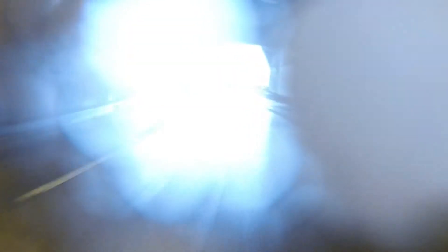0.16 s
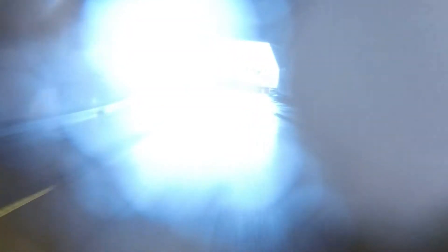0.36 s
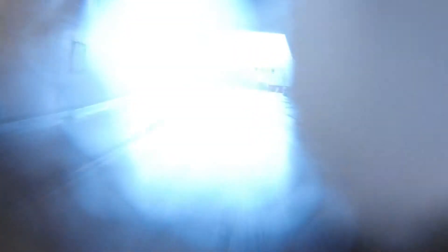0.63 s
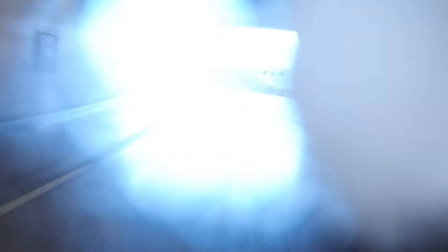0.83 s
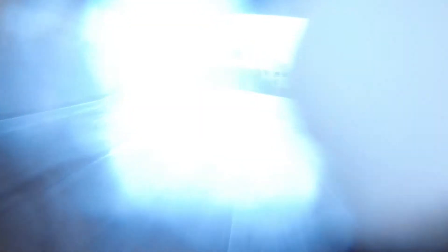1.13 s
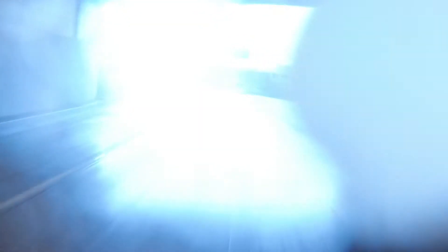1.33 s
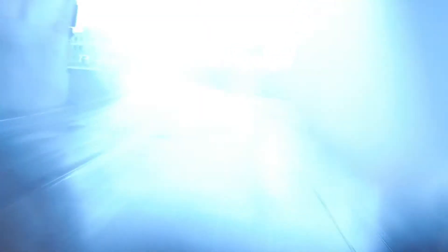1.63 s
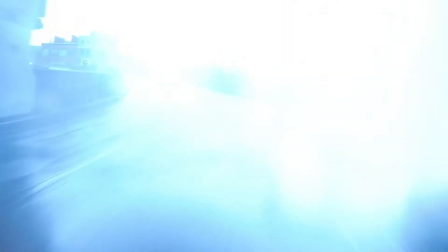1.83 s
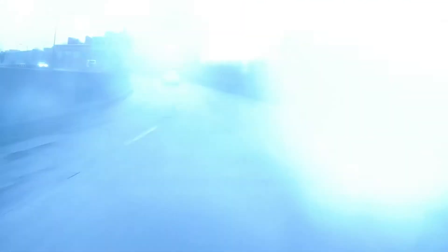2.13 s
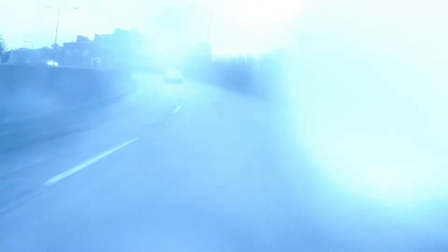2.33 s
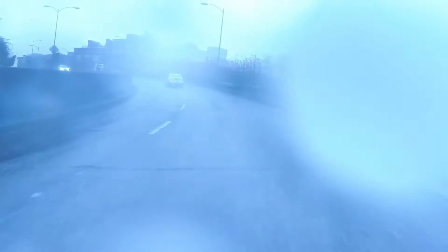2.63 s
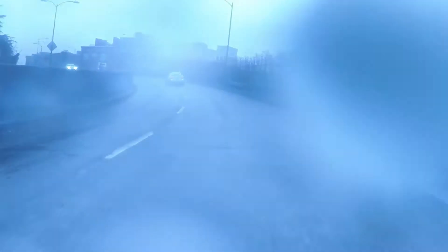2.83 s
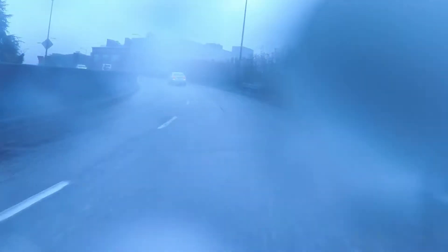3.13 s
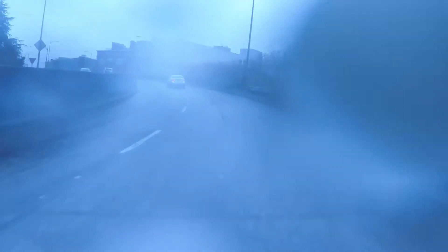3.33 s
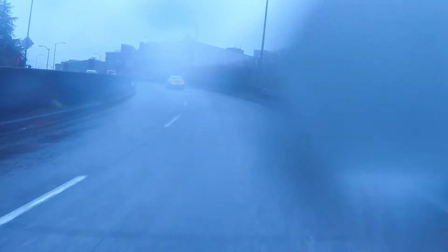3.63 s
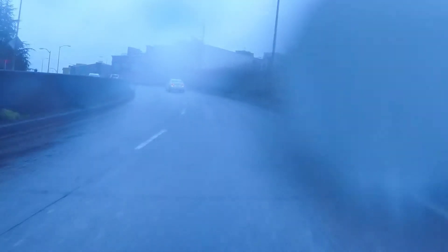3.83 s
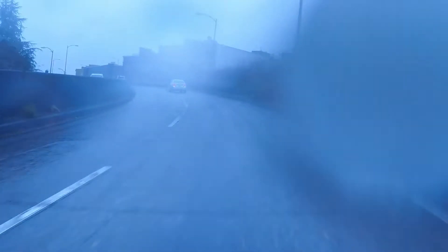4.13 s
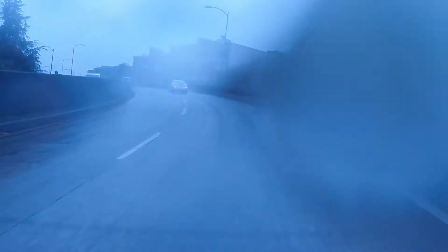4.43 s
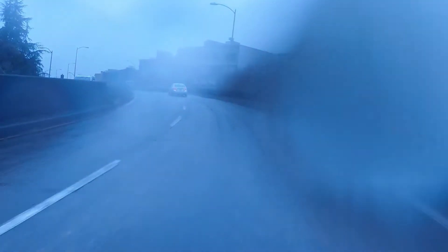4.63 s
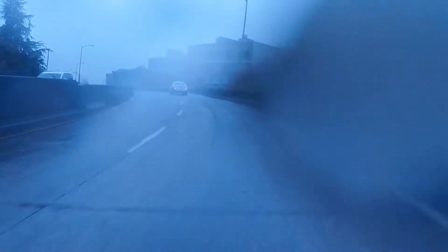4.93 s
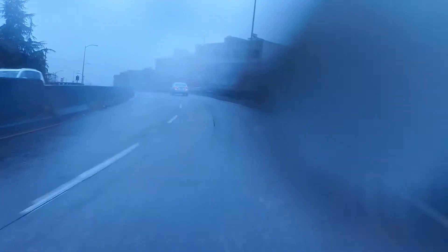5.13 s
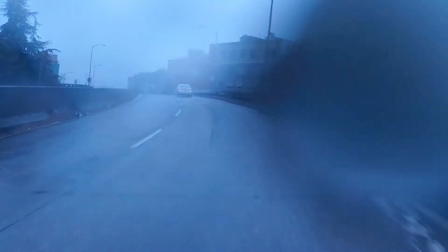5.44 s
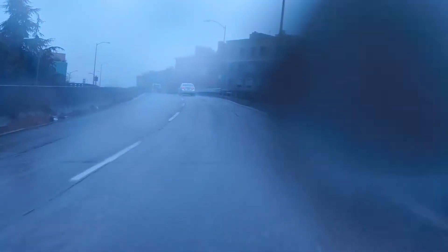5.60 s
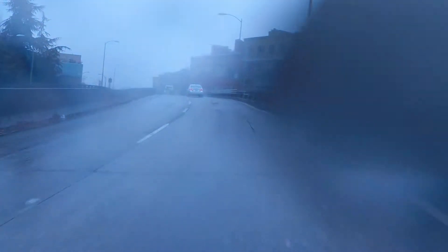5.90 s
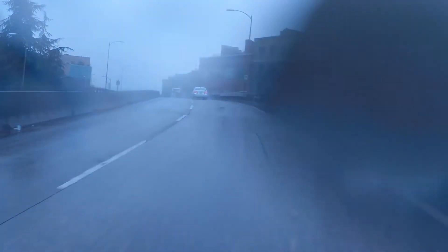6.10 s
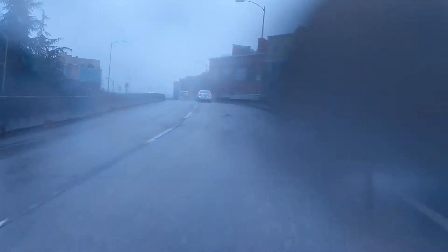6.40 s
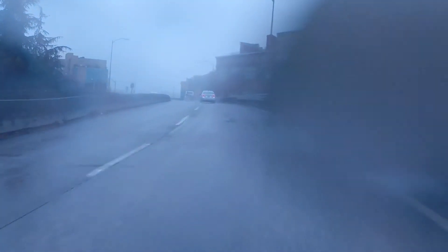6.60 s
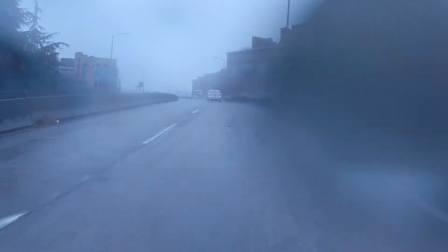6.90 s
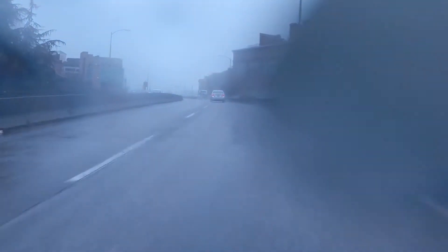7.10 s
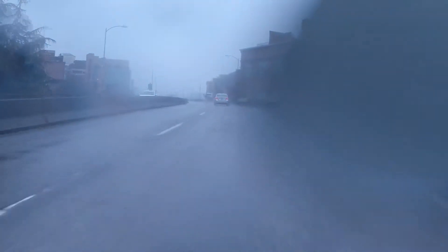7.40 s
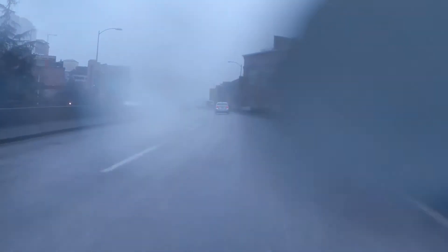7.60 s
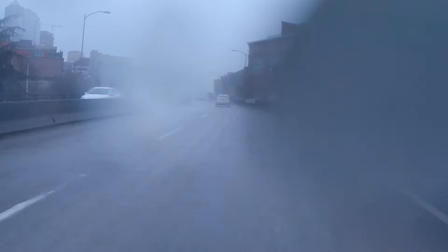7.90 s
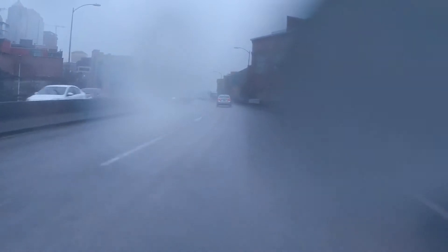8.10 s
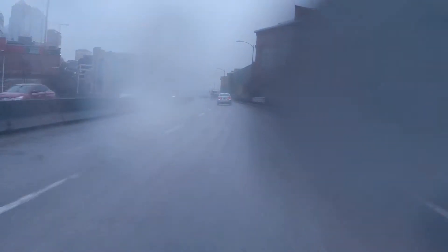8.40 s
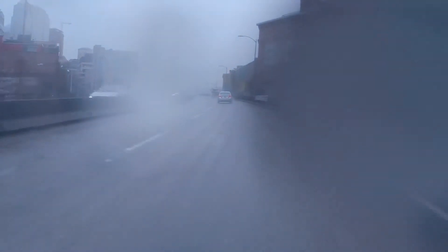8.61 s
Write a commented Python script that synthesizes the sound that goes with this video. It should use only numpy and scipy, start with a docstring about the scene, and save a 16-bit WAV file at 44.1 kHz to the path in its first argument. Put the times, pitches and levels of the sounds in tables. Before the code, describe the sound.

Steady driving heard from outside the car, very close to the wind. First comes dense tunnel tyre roar over a deep rumble; on leaving, it fades and thins to soft water hiss and rough, fluttering wind. Short muffled wind thumps and dry plastic clicks from large raindrops follow at uneven intervals, the background ducking momentarily after a few hits until the end.

```python
"""Wind buffets a microphone in a plastic housing outside a car that leaves a tunnel for rain on a wet road.
Turbulence is noise of shaped spectrum and fluctuating level; single eddies are brief resonant swells.
Tyre roar, strong in the tunnel, thins in the open; spray hisses as noise of higher bands.
Raindrops strike damped modes of the housing, three with a bright snap; the background briefly dips at times.
Gain control evens out the level and a limiter holds the peaks down."""
import sys
import numpy as np
from scipy import signal
from scipy.fft import rfft, irfft, next_fast_len
from scipy.io import wavfile
from scipy.ndimage import uniform_filter1d, minimum_filter1d, map_coordinates

SR = 44100
rng = np.random.default_rng(int(sys.argv[2]) if len(sys.argv) > 2 else 0)


def generate_wav(sig):
    """Save sig (samples, or channels by samples) to the path in sys.argv[1] as 16-bit PCM at SR."""
    pcm = np.round(np.clip(np.atleast_2d(sig).T, -1, 1) * 32767).astype(np.int16)
    wavfile.write(sys.argv[1], SR, pcm)


N = 385875

# Wind on the microphone port, before chance gusts: (time [s], rush level [dB], buffeting level [dB])
WIND_LEVELS = [(0.0, -22.5, -11), (0.14, -23.5, -15), (0.97, -18.5, -14.5), (1.17, -23, -18),
               (1.34, -19.5, -14.5), (3.19, -19, -14), (3.36, -29, -13), (3.43, -16, -15),
               (3.7, -20.5, -15), (3.73, -16, -19), (4.66, -16.5, -15.5), (4.75, -22, -20),
               (5.09, -17.5, -15), (5.68, -20, -16.5), (6.2, -18, -15.5), (6.75, -16.5, -16.5),
               (7.1, -16, -17), (7.85, -16, -13.5), (8.28, -20, -19.5), (8.63, -15.5, -16),
               (8.75, -16, -21)]
# Spectra of the turbulence, low and middle: (frequency [Hz], density [dB per Hz])
BUFFET_SPECTRUM = [(14, -31), (30, -6), (60, -2.5), (150, -8.5), (300, -21), (700, -28), (1500, -70)]
RUSH_SPECTRUM = [(80, -2), (200, 2.5), (350, -1), (700, -6.5), (1100, -16), (2000, -30), (5000, -72)]
# Hollow of the bodywork excited by the wind: (mean frequency [Hz], width [Hz], level against open-air buffeting [dB])
BODY_BOOM = (119, 32, -5)
# Eddies breaking on the port, before the shell: (middle [s], rms at the top [dB], rise and fall [s], centre [Hz])
EDDY_SLAPS = [(3.008, -14.5, .009, 602), (3.065, -12, 0.0064, 593), (3.235, -12, 0.0078, 644),
              (3.303, -15.5, .003, 675), (3.533, -7.5, .004, 682), (3.745, -11.5, 0.018, 730),
              (4.061, -11.5, .007, 654), (4.17, -9, 0.022, 846), (4.384, -8.5, 0.0037, 653),
              (4.705, -17.5, .009, 614), (5.274, -7, 0.0034, 646), (5.613, -13.5, 0.0052, 794),
              (5.643, -12, 0.0037, 580), (6.714, -14.5, 0.0037, 800), (6.738, -18.5, 0.0085, 617),
              (7.05, -8.5, 0.0045, 766), (7.085, -8.5, 0.0027, 740), (7.477, -16.5, 0.0067, 675),
              (7.6, -11.5, 0.0074, 600), (7.747, -9.5, 0.0035, 660), (7.893, -8.5, .005, 753),
              (8.008, -12, 0.011, 580), (8.147, -15, 0.0057, 610), (8.636, -10, 0.017, 736)]
# Tyre roar: (time [s], level [dB], lift of its upper part [dB])
ROAR_LEVELS = [(0.0, -20, 3.5), (1.24, -20, 0.5), (2.07, -19.5, -5.5), (2.51, -20, -17), (2.82, -21.5, -21),
               (2.95, -26.5, -3), (3.2, -29, 3.5), (4.5, -31.5, 1), (8.75, -29, 1.5)]
# Spectrum of the tyre roar before that lift: (frequency [Hz], density [dB per Hz])
TYRE_SPECTRUM = [(300, -19), (700, -3), (1000, -5), (1550, -7.5), (1900, -17.5), (2400, -25.5), (3200, -53),
                 (6000, -53.5)]
# Water thrown up from the road: (time [s], hiss level [dB], finest fizz level [dB])
SPRAY_LEVELS = [(0.0, -32, -56), (0.46, -30, -55.5), (0.85, -32, -61), (1.14, -33.5, -61),
                (1.51, -30.5, -58), (2.36, -33, -59.5), (2.7, -31.5, -53), (2.9, -34.5, -60),
                (3.05, -36.5, -69), (3.3, -35.5, -65), (3.42, -34, -61), (3.55, -34, -58), (3.68, -33, -57),
                (4.12, -33.5, -60.5), (4.48, -32, -56.5), (4.63, -33.5, -58), (4.87, -36, -69),
                (5.12, -32, -55), (5.24, -31.5, -56), (5.51, -34, -62), (5.95, -34, -62.5),
                (6.29, -31.5, -63), (6.99, -33.5, -63), (7.34, -31.5, -55), (7.99, -34.5, -60.5),
                (8.43, -31, -55), (8.75, -34.5, -61)]
# Spectra of the hiss and of the fizz: (frequency [Hz], density [dB per Hz])
SPRAY_SPECTRUM = [(900, -4), (1900, -1), (2900, -4.5), (3700, -8), (4700, -10), (6000, -10), (6900, -26),
                  (8000, -62)]
FIZZ_SPECTRUM = [(5500, -26), (6900, -9.5), (8500, -13), (9400, -17.5), (10100, -28.5), (12000, -69)]
# Large drops: (time [s], then strike level [dB] of each mode group: lowest, second, third, fourth, top)
LARGE_DROPS = [(2.6314, -10.5, -23, -18.5, -21.5, -40), (2.7481, -13.5, -12, -26, -19.5, -40),
               (2.8348, -13, -21, -28.5, -21, -40), (3.2309, -22.5, -28, -20, -21.5, -52),
               (3.4113, -14.5, -18, -16, -16.5, -28), (3.4359, -11.5, -26.5, -21, -24, -28),
               (3.965, -17, -31, -21, -22, -55), (4.0066, -4, -10.5, -14, -25, -51.5),
               (4.6483, -28.5, -29.5, -25.5, -15, -11), (4.884, -33, -32, -36, -31, -37.5),
               (4.941, -29, -28, -26.5, -20, -42), (5.069, -24.5, -27.5, -31, -34, -42.0),
               (5.2164, -12, -16.5, -14.5, -25, -35.5), (5.2506, -17, -19, -20.5, -26.5, -39.5),
               (5.4257, -30.5, -31.5, -26, -21.5, -53.0), (5.4517, -21.5, -16.5, -15, -21, -35),
               (5.586, -16.5, -16, -31, -27.5, -49.5), (5.6045, -19, -25.5, -25, -31, -45),
               (5.8356, -13.5, -18.5, -16, -12.5, -23), (5.9166, -10, -19, -22, -17, -29.5),
               (5.9937, -15, -11.5, -18.5, -23.5, -37), (6.046, -6.5, -19.5, -13, -26.5, -43),
               (6.8366, -10.5, -17.5, -14, -29.5, -49), (7.1504, -13.5, -24, -21, -36.0, -39),
               (7.4544, -17, -14.5, -11.5, -14, -34.5), (7.6157, -14, -22.5, -19, -27, -40),
               (7.6968, -12, -14.5, -16.5, -14.5, -47.0), (8.0001, -17.5, -25.5, -18, -19.5, -43),
               (8.052, -14, -19, -25, -24, -30.5), (8.0621, -0.5, -13, -9.5, -28, -24.5),
               (8.2524, -12.5, -16, -26.5, -28, -53.5)]
# Modes of the housing: (group 0 lowest to 4 top, mean frequency [Hz], level over the strike [dB], T60 [s])
SHELL_MODES = [(0, 1880, 4, .006), (0, 2300, 2, .005), (1, 3050, 7, .005), (2, 4150, 7.5, .005),
               (3, 5100, 3, .004), (3, 6200, 3.5, .005), (4, 7600, 9, .002), (4, 9300, 9, .002)]
# Transmission of the shell for drops and slaps: (frequency [Hz], gain [dB])
SHELL_GAIN = [(20, -3), (6300, -5.5), (7200, -14.5), (10500, -14), (12000, -30), (15800, -50), (22000, -57)]
# Bright snaps of three drops: (time [s], level before colouring [dB])
DROP_SNAPS = [(4.6483, -27), (7.4541, -31), (8.0621, -27)]
# Colour of a snap: (frequency [Hz], gain [dB])
SNAP_SPECTRUM = [(8000, -12), (10000, 1), (15800, -7.5)]
# Momentary reductions of the background gain, mostly after a drop: (start [s], depth without recovery [dB])
GAIN_DIPS = [(2.96, 4), (4.19, 3), (4.67, 8), (5.38, 4), (5.7, 1), (6.84, 12), (7.49, 8), (7.91, 3),
             (8.066, 14)]

GUST_DB, GUSTS_PER_S = 1, 9  # chance gusts on buffeting and rush: depth, knots a second
TUNNEL_CALM_DB = -3.5  # broad buffeting against the boom while the walls shelter the car
BOOM_WANDER, BOOM_SWELL_DB = .06, 2  # random drift of pitch (share) and of level
SLAP_WIDTH, SLAP_TOP = 2, 1.52  # resonance width and upper edge of a slap, both over its centre frequency
SNAP_T60_S = .0015
DIP_FALL_S, DIP_RECOVER_S = 0.027, 0.043
TOP_HZ = 15800  # upper limit of the band


def amp(db):
    """Definition of level: amplitude gain of a value in dB."""
    return 10 ** (np.asarray(db) / 20)


def unit(x):
    """Normalisation of power: the signal scaled to rms 1."""
    return x / np.sqrt(np.mean(x ** 2) + 1e-20)


def curves(rows):
    """Linear interpolation: one value per sample for each column after the time."""
    times, *columns = np.transpose(rows)
    return [np.interp(np.arange(N) / SR, times, column) for column in columns]


def wobble(rate):
    """Slow random fluctuation: a spline through random knots, rate of them a second."""
    knots = rng.standard_normal(int(N * rate / SR) + 4)
    return map_coordinates(knots, [np.arange(N) * rate / SR])


def filtered(x, response):
    """Linear filtering: the spectrum times a response of frequency."""
    m = next_fast_len(N + 8192)
    return irfft(rfft(x, m) * response(np.fft.rfftfreq(m, 1 / SR)), m)[..., :N]


def colour(spectrum):
    """Spectral shaping: gain interpolated in dB over log frequency."""
    hz, db = np.transpose(spectrum)
    return lambda f: amp(np.interp(np.log(f + 1), np.log(hz), db, left=-120, right=-120))


def resonance(hz, width):
    """Simple resonance: the band-pass response of one damped mode."""
    return lambda f: 1j * f * width / (hz * hz - f * f + 1j * f * width)


def noise(spectrum, patchy_db, flutter_db, flutter_hz):
    """Turbulent noise: rms 1, coloured, with random gain in time-frequency patches and a fluttering level."""
    z = signal.stft(rng.standard_normal(N + 512), nperseg=512)[2]
    field = uniform_filter1d(rng.standard_normal(z.shape), size=5, axis=0)
    field = uniform_filter1d(field, size=8, axis=1)
    patchy = signal.istft(z * amp(patchy_db * unit(field)), nperseg=512)[1][:N]
    return unit(filtered(patchy * amp(flutter_db * wobble(flutter_hz)), colour(spectrum)))


def openness():
    """Shelter by the tunnel walls: 0 in the tunnel, rising to 1 in the open."""
    return np.clip((np.arange(N) / SR - 1.6) / 2.3, 0, 1)


def buffeting(level_db):
    """Turbulent pressure on the port: low noise and bodywork boom, compressed at the hardest pushes."""
    broad = noise(BUFFET_SPECTRUM, patchy_db=.8, flutter_db=1.5, flutter_hz=6)
    low = amp(TUNNEL_CALM_DB * (1 - openness())) * broad + bodywork()
    power = np.abs(uniform_filter1d(low ** 2, size=1300))
    low = low / (power + .15) ** .22  # the capsule gives way
    return amp(level_db) * unit(low)


def bodywork():
    """Cavity resonance: narrow-band noise, modulated onto a carrier whose pitch and strength wander."""
    hz, width, boom_db = BODY_BOOM
    slow = filtered(rng.standard_normal((2, N)), lambda f: 1 / (1 + (2 * f / width) ** 2))
    phase = 2 * np.pi * np.cumsum(hz * (1 + BOOM_WANDER * wobble(2))) / SR
    band = slow[0] * np.cos(phase) + slow[1] * np.sin(phase)
    return amp(boom_db) * unit(amp(BOOM_SWELL_DB * wobble(3.6)) * band)


def wind_rush(level_db, eddies):
    """Flow noise: the middle band of turbulence, lifted a little by the shared eddies."""
    rush = noise(RUSH_SPECTRUM, patchy_db=1.0, flutter_db=1.0, flutter_hz=24.64)
    return amp(level_db + 0.17 * eddies) * rush


def slaps():
    """Breaking of single eddies on the port: resonant noise under a brief Gaussian swell."""
    out, half = np.zeros(N + SR), SR // 10
    t, f = np.arange(-half, half) / SR, np.fft.rfftfreq(2 * half, 1 / SR)
    for middle_s, db, swell_s, hz in EDDY_SLAPS:
        swell = np.exp(-(t / swell_s) ** 2)
        response = resonance(hz, SLAP_WIDTH * hz)(f) ** 2 / (1 + (f / (SLAP_TOP * hz)) ** 6)
        slap = swell * irfft(rfft(rng.standard_normal(2 * half)) * response)
        slap = slap * np.linalg.norm(swell) / np.linalg.norm(slap)  # rms about 1 at the top
        out[round(middle_s * SR) - half:][:2 * half] += amp(db) * slap
    return out[:N]


def tyre_roar(eddies):
    """Rolling noise of the tyres: a broad band whose upper part swells and sinks on its own."""
    roar_db, tilt_db = curves(ROAR_LEVELS)
    roar = noise(TYRE_SPECTRUM, patchy_db=0.73, flutter_db=0.02, flutter_hz=18)
    roar = amp(0.15 * eddies) * roar
    upper = filtered(roar, lambda f: f ** 4 / (f ** 4 + 1600 ** 4))
    return amp(roar_db) * (roar + (amp(tilt_db) - 1) * upper)


def road_spray(eddies):
    """Noise of thrown-up water: a hiss that gains a resonant hump on the wetter open road, and a fine fizz."""
    spray_db, fizz_db = curves(SPRAY_LEVELS)
    spray = noise(SPRAY_SPECTRUM, patchy_db=0.83, flutter_db=0.63, flutter_hz=39.6)
    spray = amp(0.11 * eddies) * spray
    spray = spray + 0.73 * openness() * filtered(spray, resonance(2890, 750))
    fizz = noise(FIZZ_SPECTRUM, patchy_db=3.0, flutter_db=2.0, flutter_hz=39.9)
    return amp(spray_db) * spray + amp(fizz_db + 1.0 * eddies) * fizz


def wind_and_road():
    """Superposition of airborne noise: buffeting, rush, tyre roar and spray."""
    rush_db, buffet_db = (db + GUST_DB * wobble(GUSTS_PER_S) for db in curves(WIND_LEVELS))
    eddies = wobble(14)  # small gusts shared by rush, roar, hiss and fizz
    wind = buffeting(buffet_db) + wind_rush(rush_db, eddies)
    return wind + tyre_roar(eddies) + road_spray(eddies)


def knock(strike_db):
    """Modal excitation by one drop: damped sines, set by where it lands, under the short rise of water."""
    t, ring = np.arange(SR // 40) / SR, 0
    for k, (group, hz, db, t60) in enumerate(SHELL_MODES):
        level_db = strike_db[group] + db + rng.normal(0, 1) - 60 * t / t60
        sign = -(-1) ** max(k, 1)  # the lowest pair starts together; above, neighbours swing in opposite sense
        ring = ring + sign * amp(level_db) * np.sin(2 * np.pi * hz * rng.normal(1, .03) * t)
    return ring * (1 - np.exp(-(t / .00014) ** 2))


def rain():
    """Random impacts: the large drops, and small dull ones scattered from 1.2 s on."""
    out = np.zeros(N + SR)
    small = [(rng.uniform(1.2, N / SR), *rng.normal([-24, -28, -30, -35, -62], 3)) for _ in range(40)]
    for s, *strike_db in list(LARGE_DROPS) + small:
        tick = knock(strike_db)
        out[round(s * SR):][:len(tick)] += tick
    return out[:N]


def snaps():
    """Broadband impact transient: decaying noise of random sign, coloured bright, where a bright drop lands."""
    out, t = np.zeros(N + SR), np.arange(SR // 100) / SR
    for s, db in DROP_SNAPS:
        out[round(s * SR):][:len(t)] += amp(db - 60 * t / SNAP_T60_S) * rng.choice([-1, 1], len(t))
    return filtered(out[:N], colour(SNAP_SPECTRUM))


def dips():
    """Gain modulation: at set times the gain on the background falls quickly and returns more slowly."""
    t, loss_db = np.arange(N) / SR, 0
    for s, depth_db in GAIN_DIPS:
        after = np.maximum(t - s, 0)
        fall = 1 - np.exp(-after / DIP_FALL_S)
        loss_db = loss_db + depth_db * fall * np.exp(-(after / DIP_RECOVER_S) ** 2)
    return amp(-loss_db)


def scene():
    """Superposition at one microphone: the background, slaps and rain dulled by the shell, and snaps."""
    background = dips() * wind_and_road()
    through_shell = filtered(slaps() + rain(), colour(SHELL_GAIN))
    return (background + through_shell + snaps())[None]


def record(dry):
    """Dynamic range control: gentle gain control, a peak limiter, then the band limit."""
    power = uniform_filter1d(uniform_filter1d(dry ** 2, size=1500, axis=-1), size=700, axis=-1)
    hot = amp(1.5) * dry * (np.abs(power) / amp(-24) + .05) ** -.06
    needed = np.minimum(1, amp(-.3) / (np.abs(hot) + 1e-9))  # limiter ceiling -0.3 dB
    gain = minimum_filter1d(needed, size=900, origin=150, axis=-1)
    for _ in range(3):  # smooth the limiter's gain
        gain = uniform_filter1d(gain, size=180, axis=-1)
    return filtered(hot * gain, lambda hz: hz < TOP_HZ)


dry = scene()
out = record(dry)
generate_wav(out)
```